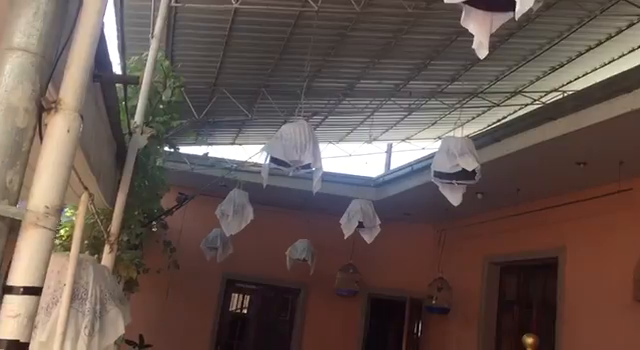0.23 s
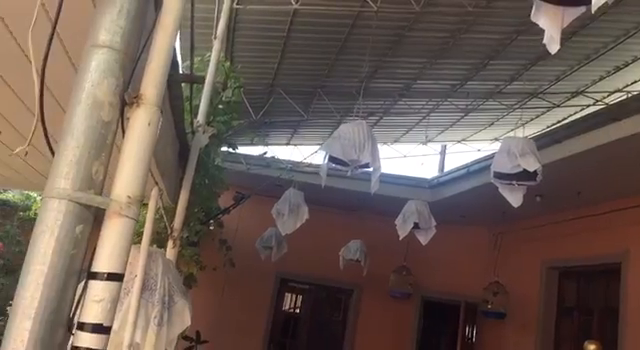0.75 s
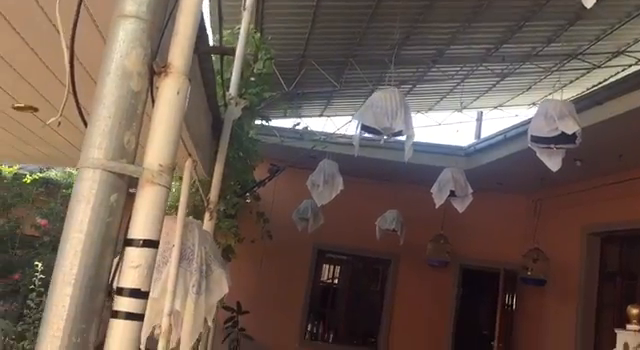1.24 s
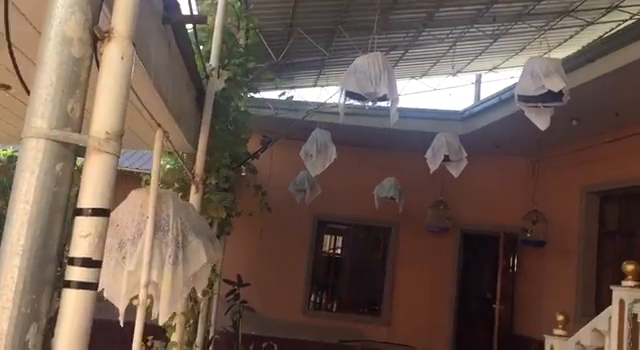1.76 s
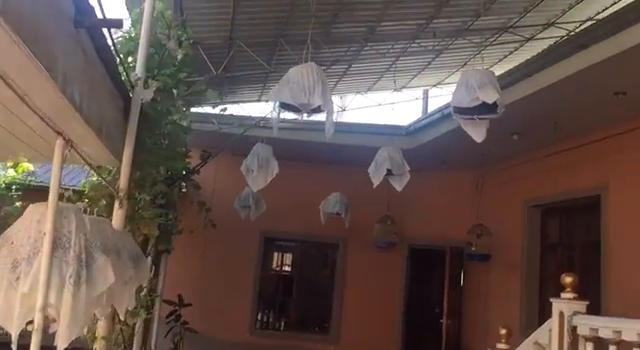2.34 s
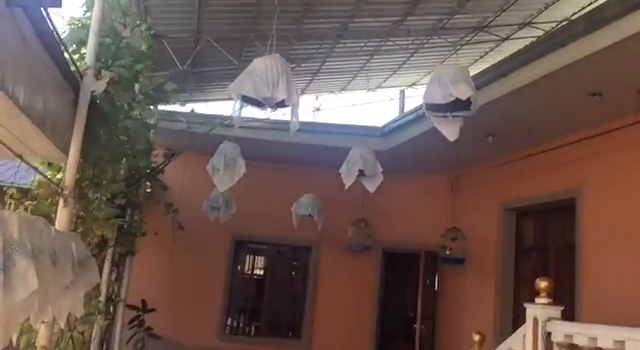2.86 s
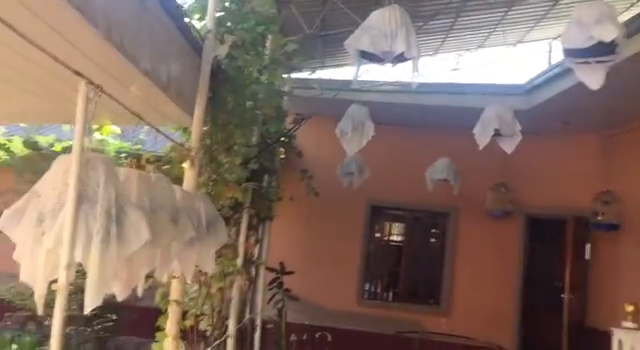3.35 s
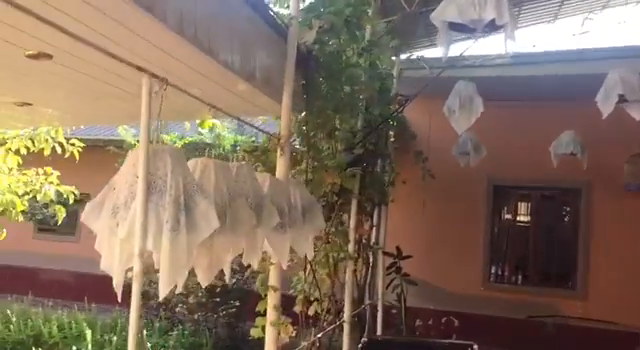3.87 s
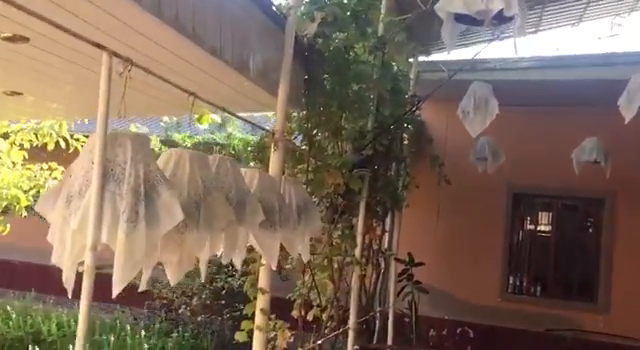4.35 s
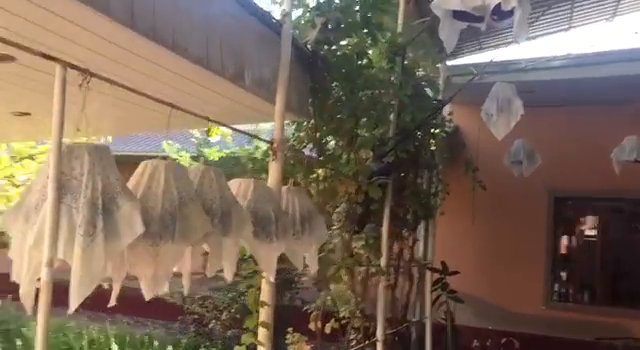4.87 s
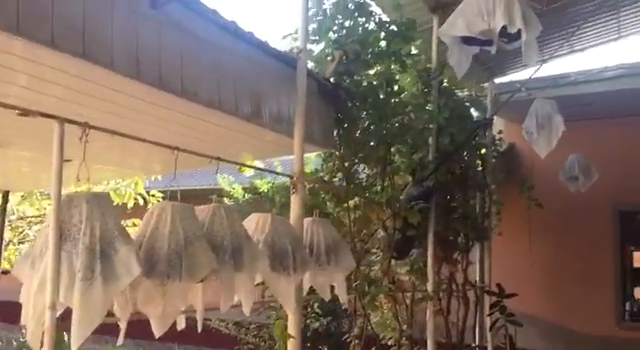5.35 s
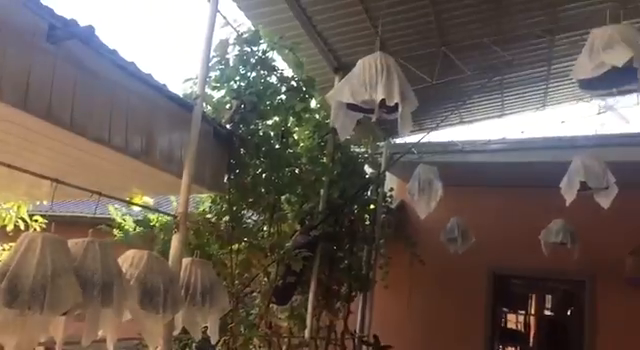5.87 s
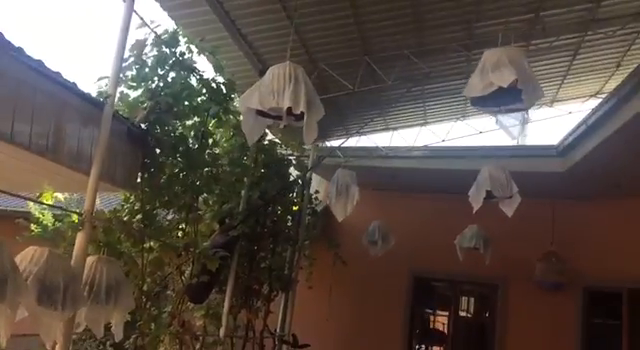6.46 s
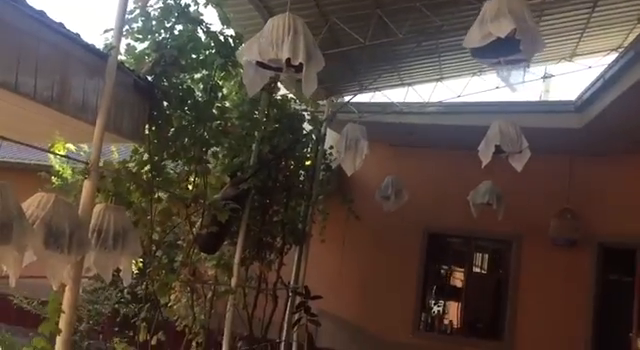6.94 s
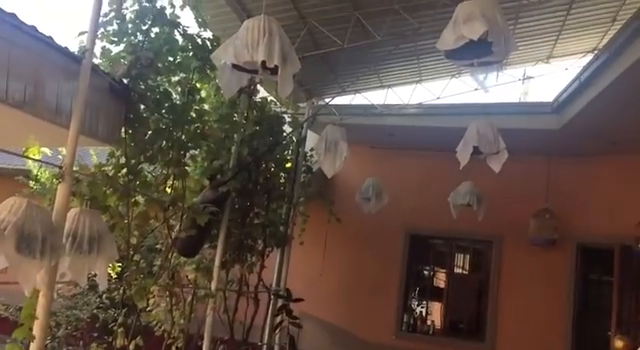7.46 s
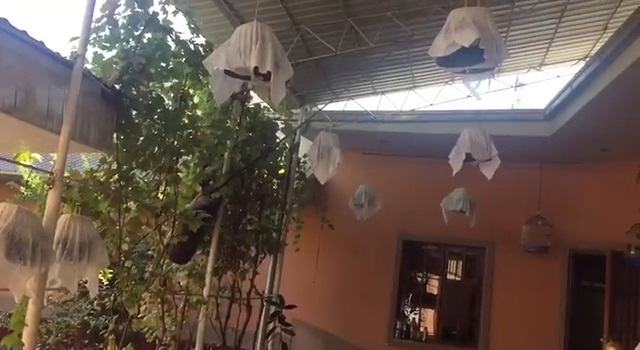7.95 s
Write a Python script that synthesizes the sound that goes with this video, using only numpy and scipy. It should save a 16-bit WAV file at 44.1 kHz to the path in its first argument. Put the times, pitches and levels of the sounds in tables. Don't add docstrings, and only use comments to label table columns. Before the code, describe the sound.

Quails in hanging cages call in a walled, roofed courtyard. After a faint sparrow chirp and small cage ticks, whip-like whistles come in groups, a soft note then two stronger ones, each darting upward in an instant and ringing off roof and walls. Low hoarse croaks flutter in between. The loudest call comes near the middle; a lone sharp note ends it. A small handheld microphone picks up faint hum and leaves.

```python
import sys
import numpy as np
from scipy import signal
from scipy.fft import rfft, irfft
from scipy.io import wavfile
from scipy.ndimage import uniform_filter1d, map_coordinates

SR = 44100
rng = np.random.default_rng(int(sys.argv[2]) if len(sys.argv) > 2 else 0)


def generate_wav(signal):
    frames = np.transpose(np.atleast_2d(signal))
    scaled = np.clip(frames, -1, 1) * 32767
    pcm = np.round(scaled).astype(np.int16)
    wavfile.write(sys.argv[1], SR, pcm)


def elevation(decibels):
    levels = np.asarray(decibels, float)
    return 10 ** (levels / 20)


N = 362061


def unit(x):
    return x / np.sqrt(np.mean(x ** 2) + 1e-20)


def along(points, hz):
    f, v = np.transpose(points)
    return np.interp(np.log(hz + 1), np.log(f + 1), v)


def wobble(n, rate):
    return map_coordinates(rng.standard_normal(size=400), [np.arange(n) * rate / SR], mode="mirror")


# freq_hz, level_db (per Hz)
HUM_SPECTRUM = [(25, -15), (80, -1.5), (480, -11), (860, -16.5), (970, -11), (4300, -25), (12100, -34),
                (16000, -61.5)]
# time_s, level_db
LEAF_SWELL = [(0, -3.3), (.9, -1.6), (1.2, 1), (2.5, 0.5), (3.4, 1.2), (5.4, 2.5), (6.6, 0), (8.2, 2)]


def town():
    hz, t, z = signal.stft(rng.standard_normal(N + SR), SR, nperseg=2048)
    field = uniform_filter1d(rng.standard_normal(z.shape), size=3, axis=0)
    field = uniform_filter1d(field, size=3, axis=1)
    lumps_db = unit(field) * along([(60, 2.5), (400, 2.6), (1500, 1.1)], hz)[:, None]
    breeze_db = np.interp(t, *np.transpose(LEAF_SWELL)) * (hz[:, None] > 900)
    gain = elevation(along(HUM_SPECTRUM, hz)[:, None] + lumps_db + breeze_db)
    noise = signal.istft(z * gain, SR, nperseg=2048)[1][:N]
    return elevation(-62) * unit(noise)


# freq_hz, t60_s
YARD_DECAY = [(300, 0.58), (800, 0.76), (2100, 0.72), (3500, 0.59), (4900, 0.52), (6500, 0.42),
              (10000, 0.21)]


def yard_tail():
    hz, t, z = signal.stft(rng.standard_normal(SR), SR, nperseg=256)
    decay = elevation(-60 * t / along(YARD_DECAY, hz)[:, None])
    tail = signal.istft(z * decay, SR, nperseg=256)[1][:SR]
    tail *= 1 - np.exp(-np.arange(SR) / SR / 0.0019)
    tail *= elevation(1.4 * wobble(SR, 70))
    return tail / np.linalg.norm(tail)


def add(out, start_s, sound, walls, yard_db):
    path = elevation(yard_db) * yard_tail()
    path[0] = 1
    roof_ms, roof_db, wall_ms, wall_db = walls
    dull = np.hanning(15) / 5
    path[round(roof_ms * SR / 1000):][:len(dull)] += elevation(roof_db) * dull
    rough = rng.standard_normal(size=40) * np.geomspace(1, 0.25, 40)
    rough[0] = 4
    rough /= np.linalg.norm(rough)
    path[round(wall_ms * SR / 1000):][:len(rough)] += elevation(wall_db) * rough
    heard = signal.fftconvolve(sound, path)
    seat = out[round(start_s * SR):][:len(heard)]
    seat += heard[:len(seat)]


# start_s, peak_db, centre_hz, length_s
CAGE_TAPS = [(0.456, -54, 1580, 0.24), (0.559, -80, 4800, 0.043), (0.664, -46, 2370, 0.092),
             (0.672, -59, 750, 0.31), (0.971, -69, 8000, 0.058), (1.032, -61, 7000, 0.03),
             (3.54, -56.5, 8000, 0.08), (3.702, -52.5, 7000, 0.18), (7.568, -53, 8000, 0.057),
             (7.848, -50.5, 5000, 0.093), (5.172, -51.5, 749.3, 0.047), (5.263, -41, 501, 0.16),
             (5.332, -56, 806, .08), (6.19, -50, 422, 0.098), (7.349, -48, 391, 0.075),
             (7.537, -49.5, 364, .08)]


def taps(out):
    t = np.arange(SR // 8) / SR
    f = np.fft.rfftfreq(len(t), 1 / SR)
    for start_s, peak_db, hz, length_s in CAGE_TAPS:
        body = (1j * f * hz / (hz * hz - f * f + 1.2 * 1j * f * hz)) ** 2
        puff = unit(irfft(rfft(rng.standard_normal(len(t))) * body, len(t)))
        attack = 1 - np.exp(-t / 0.0014)
        shape = elevation(peak_db - 60 * t / max(length_s, 0.005)) * attack
        add(out, start_s, shape * puff, WALL_ECHOES[0], -8)


# time_s, pitch_hz, level_db
CHIRP = [(0.237, 4070, -62), (.25, 4083, -40), (0.27, 4170, -48), (.282, 4410, -43), (0.297, 4780, -46.5),
         (0.331, 4786, -46.5), (.35, 4930, -51)]


def sparrow(out):
    s, hz, db = np.transpose(CHIRP)
    t = np.arange(s[0], s[-1], 1 / SR)
    phase = 2 * np.pi * np.cumsum(np.interp(t, s, hz)) / SR
    whistle = np.sin(phase) + elevation(-24.5) * np.sin(2 * phase)
    add(out, s[0], elevation(np.interp(t, s, db)) * whistle, (14.5, 4, 20.5, -7), 1.5)


def syllable(start_s, length_s, hz, db, bend):
    t = np.linspace(0, length_s, num=12)
    swell_db = -12 * np.clip(1 - t / 0.035, 0, 1)
    fade_db = -12 * t / length_s
    pitch = hz * (1 + (bend - 1) * np.exp(-t / 0.028))
    opening = 1.9 + 0 * t
    return np.c_[start_s + t, pitch, db + swell_db + fade_db, opening]


# time_s, pitch_hz, level_db, mouth_opening (favoured overtone)
NEAR_CROAKS = [
    [(3.45, 510, -43, 1), (3.474, 507.7, -43.5, 1.78), (3.538, 530.7, -36, 3.88), (3.634, 558.3, -38.5, 2),
     (3.674, 556.3, -48.5, 1.5), (3.71, 563.7, -35, 1.94), (3.756, 528.6, -32, 4.2), (3.83, 514, -54, 2.2)],
    [(7.755, 615, -40, 2.14), (7.769, 575, -36.5, 1.8), (7.781, 530.4, -29, 3.63),
     (7.827, 513.6, -33.5, 5.16), (7.92, 490, -40.5, 0.75)],
    [(7.9, 526.5, -33.5, 1.8), (7.94, 613.5, -30, 1.7), (7.968, 635, -40, 2.9), (8.0, 625, -22, 3)],
]
NEAR_CHEST = [-14.5, -7, -25.5]
# start_s, length_s, pitch_hz, level_db, chest_db
FAR_SAGS = [(1.719, 0.18, 477.2, -44.5, -12.5), (2.966, 0.038, 528, -33.5, -9.5),
            (4.121, 0.085, 520, -43, -10.5), (4.734, 0.078, 478.6, -41, -18),
            (5.8, 0.062, 492, -38.5, -39.5), (6.805, 0.19, 466, -37.5, -13)]
# start_s, length_s, pitch_hz, level_db, chest_db
FAR_CLIMBS = [(1.88, 0.091, 534, -46.5, -8), (3.002, 0.038, 604, -42.5, -8), (4.793, 0.19, 660, -47, -19.5),
              (5.882, 0.097, 608.4, -36.5, -15.5), (6.97, 0.078, 629, -31, -18.5)]
# freq_hz, level_db
THROAT_COLOUR = [(1500, 5.5), (2200, 6), (2500, 1.5), (3300, -12.5), (4500, -22), (8000, -46.5)]


def croak(rows, chest_db, shake):
    s, *columns = np.transpose(rows)
    t = np.arange(s[0], s[-1], 1 / SR)
    hz, db, mouth = (np.interp(t, s, c) for c in columns)
    pitch = hz * (1 + shake * wobble(len(t), 90))
    phase = 2 * np.pi * np.cumsum(pitch) / SR
    flutter = np.sin(2 * np.pi * np.cumsum(60 + 22 * wobble(len(t), 25)) / SR)
    buzz = np.sin(2 * np.pi * np.cumsum(140 + 15 * wobble(len(t), 25)) / SR)

    def part(order):
        high = min(order / 2 - 0.55, 1)
        hoarse = elevation(3 * flutter + 5 * high * buzz + 3.5 * wobble(len(t), 100))
        hoarse = hoarse * (1 + 0.25 * high * wobble(len(t), 500))
        mouth_loss_db = np.minimum(8 * abs(order - mouth), 15)
        level = elevation(db - mouth_loss_db + along(THROAT_COLOUR, order * pitch))
        return level * hoarse * np.sin(order * phase + order ** 2)

    voice = elevation(db + chest_db + 0.8 * flutter + 3 * wobble(len(t), 60)) * np.sin(phase)
    voice += elevation(-3.5) * part(2)
    voice += elevation(-4.5) * (part(3) + 0.39 * part(4))
    voice += elevation(-6.5) * sum(part(k) for k in np.arange(5, 12))
    return signal.windows.tukey(len(t), 0.1) * voice


def croaks(out):
    calls = [(rows, chest_db, 0.016) for rows, chest_db in zip(NEAR_CROAKS, NEAR_CHEST)]
    for table, bend in (FAR_SAGS, 1.14), (FAR_CLIMBS, 0.84):
        calls += [(syllable(*row[:-1], bend), row[-1], 0.04) for row in table]
    for rows, chest_db, shake in calls:
        add(out, rows[0][0], croak(rows, chest_db, shake), WALL_ECHOES[0], -1.5)


# time_ms, pitch_hz, level_db
WHIP_SWEEP = [(-21, 960, -50.5), (-7, 1420, -25.5), (-3.5, 1705, -13.5), (1, 1995, -4.5), (6, 2184, 0.06),
              (8.5, 2403, -5.5), (12, 2708, -1.4), (15, 3575, -0.5), (16.5, 4810, -19)]
# multiple, level_db
WHISTLE_OVERTONES = [(2, -29), (3, -47.5), (4, -42), (5, -51)]
# freq_hz, level_db
BEAK_COLOUR = [(2500, 6), (4300, -7), (5200, -1.5), (6500, -4.5), (8500, -3.5), (10500, -7.5), (12500, -20)]
# start_s, peak_db, pitch_scale, yard_db
PHRASES = [
    [(1.4661, -16.5, 0.95, 0), (1.6786, -6, 1, 1.2), (1.8048, -5.5, 0.96, -6)],
    [(1.5914, -22.5, 0.94, 4), (1.8274, -10.5, .99, 0.9), (1.944, -9.5, 1.005, 1.15)],
    [(2.6938, -7, 0.96, -2), (2.9238, -4.5, 0.99, -0.2), (3.0385, -6, 1.003, -1.5)],
    [(3.8556, -3.5, 0.97, -6), (4.0851, -0.2, 1.023, -5), (4.2038, -3, 1, -5.5)],
    [(4.4543, -10.5, 0.9, 2.2), (4.7047, -7, 0.94, 1.95), (4.8359, -9, .96, 2)],
    [(5.5912, -7, 0.92, -0.9), (5.8292, -6.5, 0.94, 1.3), (5.9614, -8, .92, 0.9)],
    [(6.6772, -6.5, 0.91, 0.7), (6.9087, -3.5, 0.91, -0.6), (7.0424, -6, 0.91, 0.1)],
    [(7.2933, -4, .97, 1), (7.4006, -6.5, 1.012, -1)],
    [(8.0039, -2, 0.98, -1.5)],
]
# sweep_pace, lead_in_db, high_snap_db, overtones_db
BIRDS = [(.8, -8, -13, -0.5), (1.2, 2.8, -1.9, -0.4), (1, 1.5, -2, 2), (.94, 3.5, -2.5, 2.5),
         (.92, 0.5, -3.5, 1.5), (.84, 0.5, -2.5, 2), (.92, -3, -4.5, 1.5), (.76, 3.5, -9, -11.5),
         (.76, 6.5, -7.5, -1)]
# roof_ms, roof_db, wall_ms, wall_db
WALL_ECHOES = [(4.513, -8, 14.1, -6.5), (2.7, -15, 27, -3.5), (2.9, -6.5, 25, -4), (5.8, -8.5, 21.1, -14),
               (12, -9, 15, -14.1), (9.2, -8, 22, -3), (6.1, -6, 13, -4), (2.4, -1, 30, -18.5),
               (2.4, -2.4, 20.2, -6)]


def quail(out):
    ms, hz, level = np.transpose(WHIP_SWEEP)
    for notes, (pace, lead_db, snap_db, bright_db), walls in zip(PHRASES, BIRDS, WALL_ECHOES):
        t = np.arange(ms[0] * pace, ms[-1] * pace, 1000 / SR) / pace
        for start_s, peak_db, scale, yard_db in notes:
            pitch = scale * np.interp(t, ms, hz)
            phase = 2 * np.pi * np.cumsum(pitch) / SR
            tone = np.sin(phase)
            for k, share_db in WHISTLE_OVERTONES:
                unsteady_db = 4 * wobble(len(t), 700)
                colour_db = bright_db + along(BEAK_COLOUR, k * pitch)
                tone += elevation(share_db + colour_db + unsteady_db) * np.sin(k * phase)
            opening_db = -3 * (start_s == notes[0][0])
            bearing_db = (lead_db + opening_db) * np.clip(-t / 8, 0, 1)
            bearing_db += snap_db * np.clip((t - 8) / 6, 0, 1)
            shut = np.clip((ms[-1] - t) / 1.2, 0, 1)
            size = elevation(peak_db - 3.5 + np.interp(t, ms, level) + bearing_db)
            add(out, start_s + ms[0] * pace / 1000, size * shut * tone, walls, yard_db)


def scene():
    out = town()
    for source in taps, sparrow, croaks, quail:
        source(out)
    return out[None]


def masked(x, depth_db):
    hz, t, z = signal.stft(x, SR, nperseg=1024)
    power = uniform_filter1d(abs(z) ** 2, size=12, axis=1)
    power = uniform_filter1d(power, size=3, axis=2)
    hidden = power < elevation(-2 * depth_db) * power.max(axis=1, keepdims=True)
    band = ((hz > 4300) & (hz < 5350))[:, None]
    return signal.istft(z * ~(hidden & band), SR, nperseg=1024)[1][:, :N]


def top_cut(x):
    return signal.sosfilt(signal.butter(12, 12280, fs=SR, output="sos"), x)


def record(dry):
    ceiling, knee = 0.79, 10
    soft = dry / (1 + abs(dry / ceiling) ** knee) ** (1 / knee)
    treble_cut = signal.butter(6, 11300, fs=SR, output="sos")
    bass_cut = signal.butter(4, 36, "high", fs=SR, output="sos")
    heard = signal.sosfilt(np.vstack([treble_cut, bass_cut]), soft)
    mix = masked(heard, depth_db=40)
    return top_cut(mix)


dry = scene()
out = record(dry)
generate_wav(out)
```